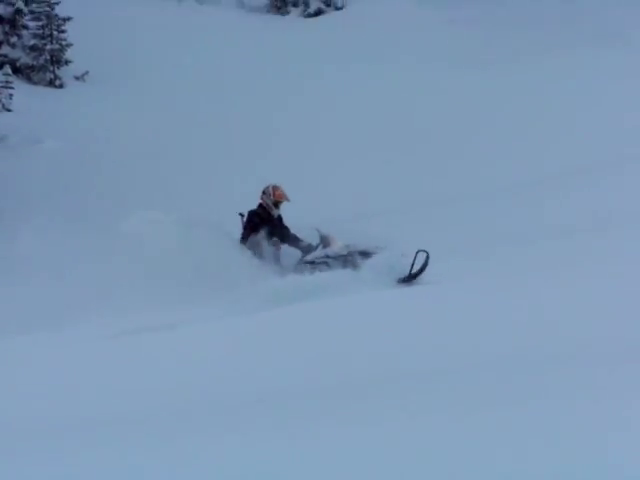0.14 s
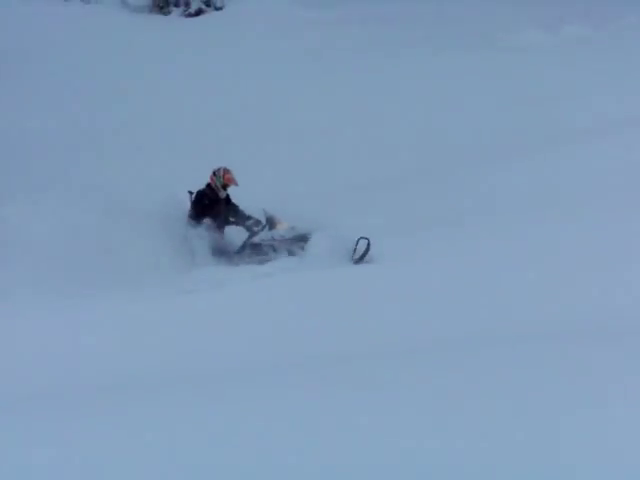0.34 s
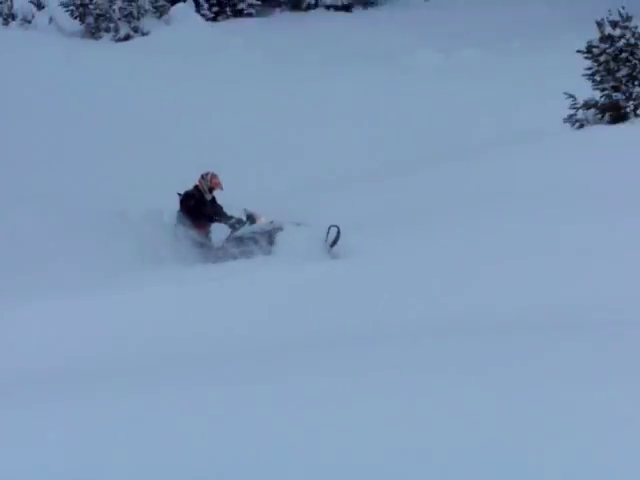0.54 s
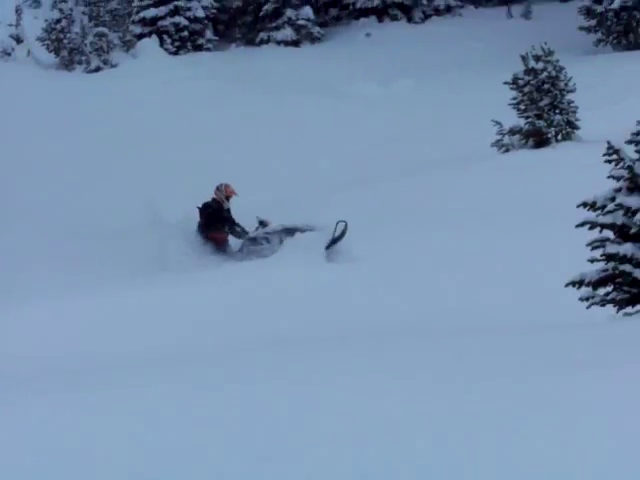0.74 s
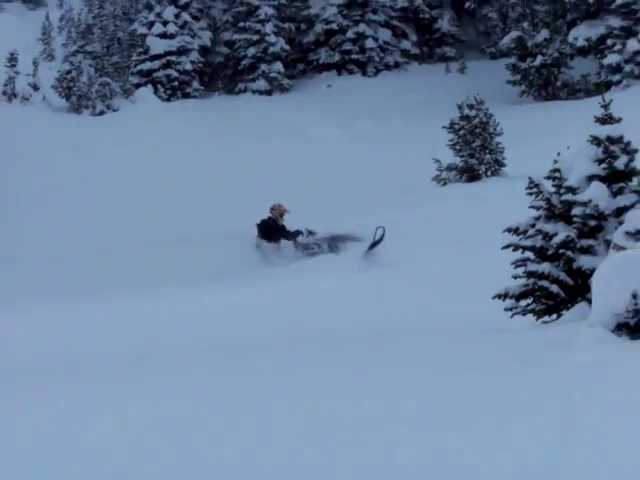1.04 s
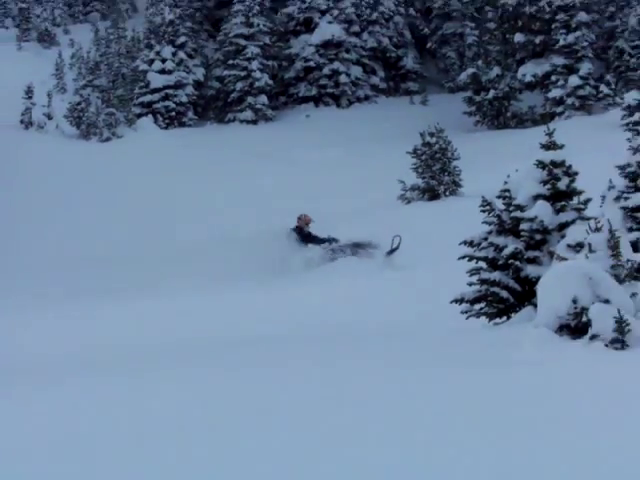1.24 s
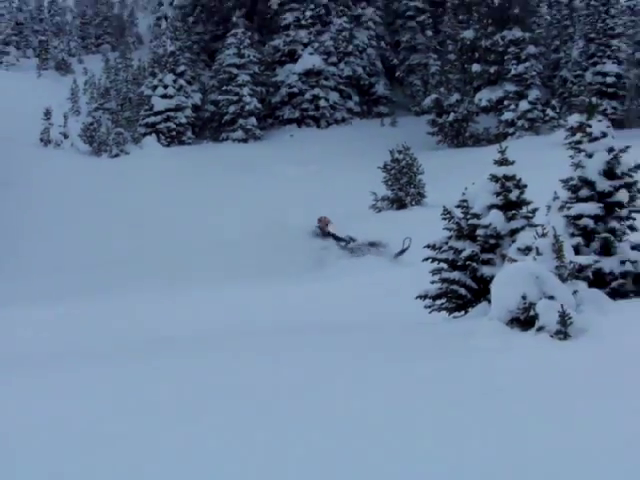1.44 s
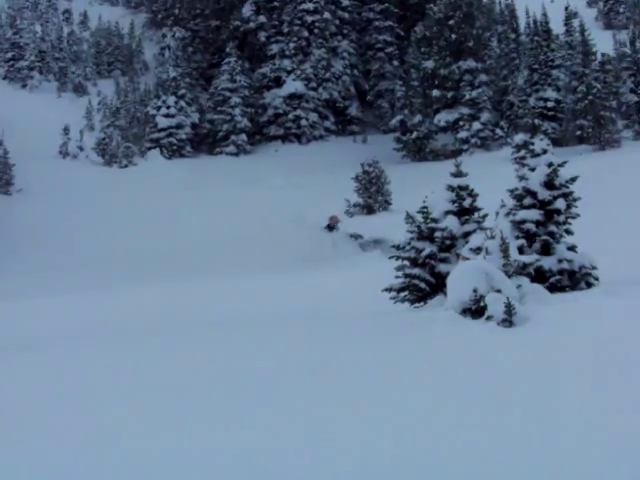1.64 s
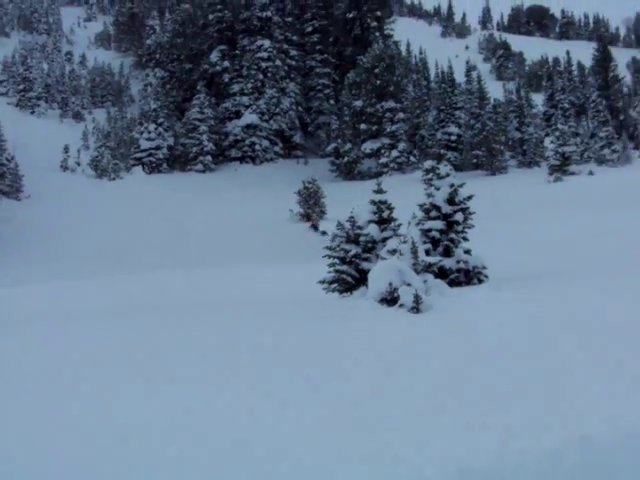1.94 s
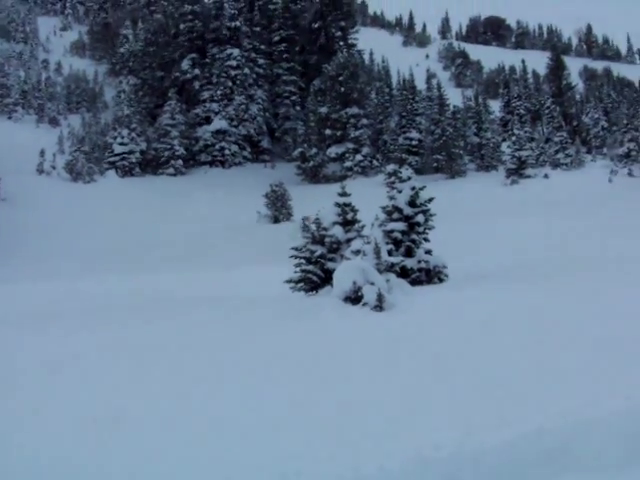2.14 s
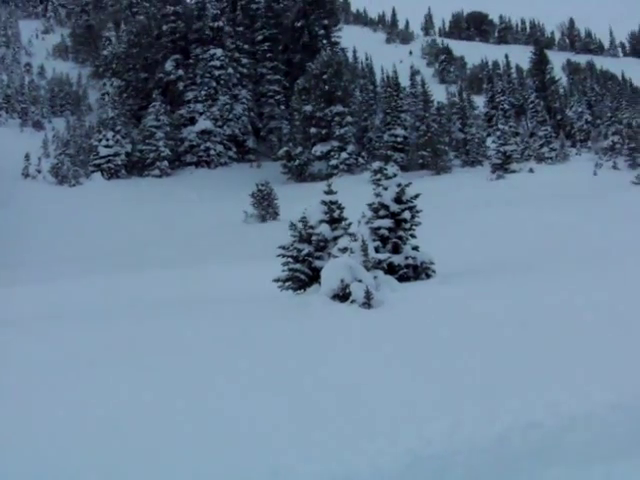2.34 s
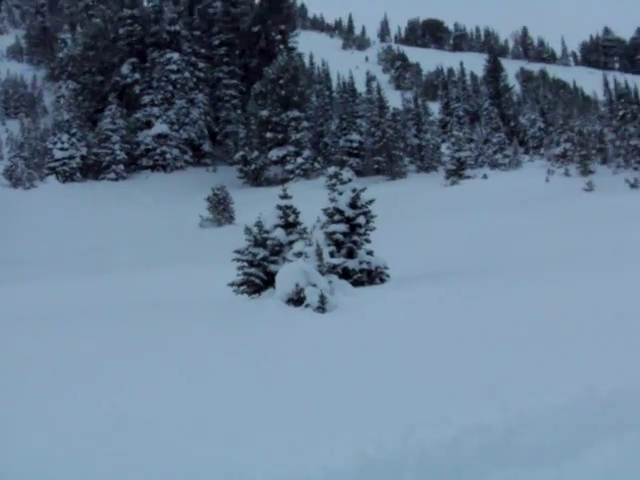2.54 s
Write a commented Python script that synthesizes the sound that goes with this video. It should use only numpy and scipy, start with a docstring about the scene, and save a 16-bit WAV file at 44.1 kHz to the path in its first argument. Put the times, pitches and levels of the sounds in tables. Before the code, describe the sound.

A two-stroke snowmobile dips briefly, revs up and holds a high, raspy whine, then dulls and fades as it draws away across the snow. Wind gusts buffet the microphone, and one sharp tick sounds close by near the end.

```python
"""A two-stroke twin snowmobile in deep snow, heard from a camera's stereo microphone in light wind.
At first the throttle dips, and a gust buffets the microphone as the revs climb. By 0.6 s the throttle is
fully open and the clutch holds the speed, each firing barking through the exhaust with a rasp of gas.
The machine draws away through more gusts; from about 2 s its tone fades and dulls behind firs.
Just before the end there is one sharp tick close by."""
import sys
import numpy as np
from scipy import signal
from scipy.fft import rfft, irfft
from scipy.io import wavfile

SR = 44100
rng = np.random.default_rng(int(sys.argv[2]) if len(sys.argv) > 2 else 0)


def store_wav(level_fs):
    """Save 16-bit WAV to argv[1]."""
    pcm = np.round(np.clip(np.atleast_2d(level_fs), -1, 1) * 32767)
    wavfile.write(sys.argv[1], SR, pcm.T.astype(np.int16))


N = 119070
T = np.arange(N) / SR
HZ = np.maximum(np.arange(N // 2 + 1) * SR / N, 1)


def from_db(db):
    """Decibels to gain."""
    return 10 ** (np.asarray(db) / 20)


def in_time(rows, t=T):
    """The columns of a time table, joined by straight lines."""
    times, *columns = np.transpose(rows)
    return np.array([np.interp(t, times, column) for column in columns])


def at_hz(points, hz):
    """A spectrum table read on a log-frequency axis."""
    f, value = np.transpose(points)
    return np.interp(np.log(hz), np.log(f), value)


def drift(per_s, t=T):
    """Smooth random wandering of spread 1."""
    grid_hz = 2000
    pole = np.exp(-2 * np.pi * per_s / grid_hz)
    slow = signal.lfilter([1], [1, -2 * pole, pole * pole], rng.standard_normal(8000))[2500:]
    return np.interp(t * grid_hz, np.arange(len(slow)), (slow - slow.mean()) / slow.std())


def noise(spectrum):
    """Noise with a given level per Hz."""
    return irfft(rfft(rng.standard_normal(N)) * from_db(at_hz(spectrum, HZ)) * np.sqrt(SR / 2), N)


# Wind right on the microphone, before pan and gusts: f/Hz, level/dB per Hz
WIND_SPECTRUM = [(15, -88), (30, -81), (55, -77.5), (90, -73.5), (130, -82), (200, -83), (320, -95),
                 (800, -115)]
# Gusts at the right port: t/s, half length/s, gain/dB
WIND_GUSTS = [(0.282, 0.017, 26.5), (0.608, 0.15, 12), (1.164, 0.054, 14), (1.864, 0.038, 16),
              (2.242, 0.028, 18.5)]
def wind():
    """Lumpy rumble, separate at each microphone port; breeze and gusts hit the right one harder."""
    breeze = np.array([noise(WIND_SPECTRUM) * from_db(side_db - 3.5 * drift(per_s=4.6))
                       for side_db in (-5, 5)])
    push = sum(from_db(db) * np.exp(-.5 * ((T - s) / width) ** 2) for s, width, db in WIND_GUSTS)
    eddies = signal.sosfilt(signal.butter(2, 120, fs=SR, output="sos"), noise(WIND_SPECTRUM))
    return breeze + push * eddies * np.array([[0.19], [1]])


# Modes of the small thing near the microphone: f/Hz, level/dB, t60/s
TICK_RING = [(1750, -10, 0.015), (2630, -4.5, 0.007), (3080, -18.5, 0.006), (3780, -14, 0.0041),
             (4700, -9.5, 0.0078)]
def tick(at_s=2.5865, attack_s=0.0009, crack_db=-3, crack_t60_s=0.011):
    """Something small and hard snaps close by: a dry crack that rings only briefly."""
    age = np.maximum(T - at_s, 0)
    crack = from_db(crack_db - 60 * age / crack_t60_s) * rng.standard_normal(N)
    out = signal.sosfilt(signal.butter(2, (1700, 5800), "band", fs=SR, output="sos"), crack + 1e-18)
    for k, (hz, db, t60) in enumerate(TICK_RING):
        decay = from_db(db - 60 * (age - attack_s) / t60)
        out += (-1) ** k * decay * np.sin(2 * np.pi * hz * age)
    return out * np.minimum(age / attack_s, 1) ** 2


# Balance of the microphone ports: f/Hz, left minus right/dB
MIC_BALANCE = [(60, -31), (88, 3), (130, 5.5), (190, -4), (280, 0.5), (420, -3.5), (610, -3), (910, -4),
               (1330, -7), (1970, -6.5), (2900, 6), (4270, -7.5), (6290, -8), (9270, -2)]
# Phase between the ports: f/Hz, lead of the left/rad
MIC_PHASE = [(200, -0.22), (900, -0.34), (1700, -0.39), (2000, 0.83), (2600, 0.94), (3000, -.3),
             (3600, -0.65), (4600, -0.083), (6000, -0.1), (7300, 0.74), (8800, -0.61)]
def microphone_ports(x):
    """The camera body gives each port its own colour and phase."""
    lean = from_db(at_hz(MIC_BALANCE, HZ) / 2) * np.exp(.5j * at_hz(MIC_PHASE, HZ))
    pair = np.array([lean, 1 / lean])
    return irfft(rfft(x) * pair / abs(pair.mean(axis=0)), N)


def band_shares(hz):
    """How much a frequency belongs to bass, middle, bite and treble."""
    crossovers_hz = (293, 850), (1750, 2900), (4600, 5560)
    over_bass, over_middle, treble = (np.interp(hz, edges, [0, 1]) for edges in crossovers_hz)
    return np.array([1 - over_bass, over_bass - over_middle, over_middle - treble, treble])


# The notch at the microphone climbs as the machine draws away: t/s, f/Hz
SNOW_NOTCH = [(.3, 600), (.65, 960), (1.15, 1560), (1.8, 1970), (2.7, 2230)]
def snow_reflection_db(hz, t, depth_db=-7, width_octaves=0.048):
    """Sound reflected off the snow partly cancels a narrow band and its octave in the middle range."""
    octaves = np.log2(hz / in_time(SNOW_NOTCH, t)[0])
    dips = sum(np.exp(-.5 * ((octaves - n) / width_octaves) ** 2) for n in (0, 1))
    return band_shares(hz)[1] * depth_db * dips


# The engine from the open snow into the firs: t/s, then relative level/dB of middle, bite, treble
ENGINE_LEVELS = [(0, -27.5, -18, -20.5), (0.04, -23.5, -17, -33.5), (0.07, -33.5, -29, -33.5),
                 (0.085, -23.5, -15, -28), (0.16, -34, -20, -28.5), (0.25, -26, -19.5, -28),
                 (0.39, -30, -17, -28.5), (0.5, -19, -14, -24), (0.56, -17.5, -12.5, -22),
                 (0.72, -18.5, -14, -20.5), (0.93, -19, -16, -17), (1.08, -19, -16, -21),
                 (1.2, -19, -15, -19.5), (1.32, -17.5, -17.5, -25.5), (1.63, -17.5, -15, -18),
                 (1.95, -19, -18.5, -23), (2.22, -19, -22, -28.5), (2.4, -19.5, -27.5, -33.5),
                 (2.55, -23, -29, -34), (2.7, -29, -28, -35.5)]
def swing_db(t, bass_follows=0.18):
    """Engine loudness in the four bands around their means; the bass weakly follows the middle."""
    db = in_time(ENGINE_LEVELS, t)
    db -= db.mean(axis=1, keepdims=True)
    return np.vstack([bass_follows * db[0], db])


# Rush of exhaust gas, before swing and share: f/Hz, level/dB per Hz
GAS_SPECTRUM = [(200, -74), (310, -80), (400, -69.5), (550, -70.5), (720, -66), (1000, -64), (1500, -60),
                (2000, -61), (2500, -61), (3100, -57), (3900, -58), (4600, -60), (5600, -66), (7200, -71),
                (8000, -78), (8900, -82), (9800, -92)]
# Its share, largest with the throttle half shut: t/s, gain/dB
GAS_SHARE = [(0, 3.5), (.12, 2.5), (.25, 1.3), (.45, -1), (.6, -2), (1.5, -2.5), (2.1, -2.5), (2.7, -.5)]
def exhaust_rasp(phase, pulsing=0.1, behind_firs_s=1.8):
    """A puff of turbulent gas with each firing; one cylinder barks harder, so the middle range lopes."""
    puffs = np.exp(pulsing * np.cos(phase))
    gas = rfft(rng.standard_normal(N) * puffs / np.sqrt(np.mean(puffs ** 2)))
    bands = irfft(gas * from_db(at_hz(GAS_SPECTRUM, HZ)) * np.sqrt(SR / 2) * band_shares(HZ), N)
    lope = np.where(T > behind_firs_s, 0.39, 0.084)
    bands[1] *= (1 + lope * np.cos(phase / 2)) / np.sqrt(1 + lope ** 2 / 2)
    return (bands * from_db(swing_db(T) + in_time(GAS_SHARE))).sum(axis=0)


# Overtones that swell and die away: middle t/s, length/s, multiple of the firing rate, peak level/dB
WHINE_SWELLS = [(0.229, 0.043, 10, -22.5), (0.282, 0.13, 6, -25), (0.292, 0.15, 4, -27.5),
                (0.465, 0.12, 14, -19.5), (0.498, 0.055, 15, -18.5), (0.598, 0.25, 12, -18.5),
                (0.623, 0.78, 16, -21.5), (0.75, 0.51, 6, -23), (0.845, 0.7, 14, -19.5),
                (0.9, 0.27, 21, -27), (1.068, 0.39, 9, -23.5), (1.115, 0.43, 7, -24.5),
                (1.116, .24, 13, -19.5), (1.32, 0.44, 16, -21.5), (1.398, .6, 12, -19.5),
                (1.664, 0.43, 9, -24.5), (1.668, 0.29, 14, -21.5), (1.794, 0.3, 15, -22.5),
                (1.896, 0.71, 11, -22.5), (2.01, 0.76, 19, -28.5), (1.2, 0.55, 24, -29.5),
                (2.1, 0.49, 12, -26), (2.16, .32, 16, -27.5), (.62, 0.29, 20, -26), (0.089, 0.2, 4, -33.5),
                (.94, 0.14, 18, -25.5), (2.488, .1, 19, -32)]
def whine_db(k, t):
    """Level of harmonic k where it swells into a whine: a rounded arch, 6 dB down at its ends."""
    arches = [db - 6 * abs(2 * (t - s) / length) ** 3
              for s, length, multiple, db in WHINE_SWELLS if multiple == k]
    return np.max(arches + [np.full(len(t), -np.inf)], axis=0)


# Exhaust harmonics at part throttle: multiple of the firing rate, base level/dB
PART_THROTTLE_TONE = [(1, -44.5), (2, -46), (4, -29.5), (6, -29.5), (8, -27.5), (12, -36), (15, -30.5),
                      (17, -32), (20, -36.5), (28, -43), (36, -80)]
# The same flat out: multiple, base level/dB
FULL_THROTTLE_TONE = [(1, -46), (2, -46), (4, -37), (5, -36), (6, -33), (8, -38), (9, -34.5), (10, -36),
                      (11, -31.5), (13, -27.5), (15, -27.5), (17, -32.5), (19, -34.5), (20, -40.5),
                      (24, -41), (29, -44), (31, -108), (35, -56.5), (38, -71.5)]
# Clarity of the harmonics, which grows as the throttle opens: t/s, gain/dB
TONE_CLARITY = [(0, -12), (.12, 1.5), (.22, 1.5), (.45, 4), (.6, 1), (2.7, -2)]
# Unequal cylinders add lines halfway between the harmonics: t/s, level/dB relative to them
HALF_LINES = [(0, -14), (.3, -10.5), (.6, -11), (1.4, -11.5), (2.0, -10), (2.7, -5)]
def exhaust_line_db(k, shares, t, on_pipe_s=0.44):
    """Level at k times the firing rate; the tone switches as the revs reach the tuning of the pipe."""
    db = np.where(t > on_pipe_s, at_hz(FULL_THROTTLE_TONE, k), at_hz(PART_THROTTLE_TONE, k))
    db += (shares * swing_db(t)).sum(axis=0) + in_time(TONE_CLARITY, t)[0]
    if k % 1:
        db += in_time(HALF_LINES, t)[0] + 5.5 * shares[1]   # stronger in the middle range
    return db


# The third harmonic, the low voice of the pipe: t/s, level/dB
PIPE_VOICE = [(0, -47), (.4, -44), (.55, -34), (.7, -28), (1.2, -30), (1.5, -27), (1.65, -37), (1.88, -54),
              (2.05, -33), (2.3, -46), (2.68, -32)]
def exhaust_note(rate, phase, fade_db=2.2, flutter_db=1.5, smear_rad=1.23):
    """The bark from across the snow: harmonics and half lines, each fading and fluttering on its own."""
    t, rate = T[::64], rate[::64]
    out = np.zeros(N)
    for k in np.arange(1, 39, 0.5):
        shares = band_shares(k * rate)
        unrest = 1 - 0.32 * shares[0]   # the bass is steadier
        db = exhaust_line_db(k, shares, t) + snow_reflection_db(k * rate, t)
        db += unrest * fade_db * drift(per_s=2.2, t=t)
        if k == 3:
            db = in_time(PIPE_VOICE, t)[0]
        db = np.maximum(db, whine_db(k, t))
        db += unrest * flutter_db * drift(per_s=30, t=t)
        # the path to the microphone smears each pulse
        smear = np.interp(T, t, smear_rad * unrest * drift(per_s=0.75, t=t))
        half_line_phase = (k % 1) * rng.uniform(0, 2.36) * 2 * np.pi
        out += np.interp(T, t, from_db(db)) * np.sqrt(2) * np.sin(k * phase + smear + half_line_phase)
    return out


# Engine speed, dipping, climbing, then held by the clutch: t/s, firing rate f/Hz
FIRING_RATE = [(0, 208.1), (0.025, 200.0), (0.075, 181.3), (0.125, 189.6), (0.16, 191.8), (0.335, 226.3),
               (0.4, 234.6), (0.49, 246.0), (0.585, 254.9), (0.7, 255.1), (0.89, 251.6), (0.96, 252.3),
               (1.12, 249.2), (1.31, 248.4), (1.4, 249.9), (1.49, 248.1), (1.63, 250.2), (1.78, 248.9),
               (1.91, 251.6), (1.97, 250.6), (2.2, 252.5), (2.4, 250.7), (2.6, 250.4), (2.7, 252.3)]
def firings(wobble_hz=0.34, jitter_cycles=0.0013):
    """Rate and phase of the twin's firings, with unsteady speed and ignition."""
    rate = in_time(FIRING_RATE)[0] + wobble_hz * drift(per_s=25)
    cycles = np.cumsum(rate) / SR + jitter_cycles * drift(per_s=150)
    return rate, 2 * np.pi * cycles


def scene():
    """The engine out on the snow, the tick close by and the wind on the microphone itself."""
    rate, phase = firings()
    engine = exhaust_note(rate, phase) + exhaust_rasp(phase)
    scattered = from_db(-13) * exhaust_rasp(phase) * np.array([[1], [-1]])
    return microphone_ports(engine + tick()) + scattered + wind()


def record(dry, overload=1.21, cutoff_hz=9650):
    """The camera clips any peak past its overload point and cuts the top."""
    clipped = np.clip(dry, -overload, overload)
    return signal.sosfilt(signal.ellip(10, .1, 80, cutoff_hz, fs=SR, output="sos"), clipped)


dry = scene()
out = record(dry)
store_wav(out)
```